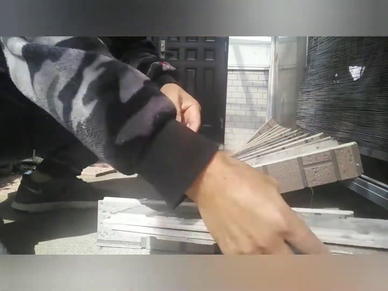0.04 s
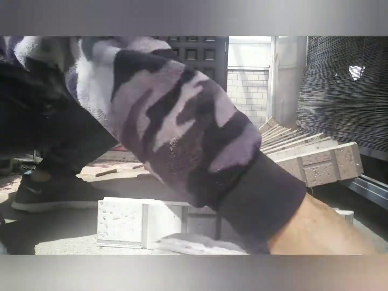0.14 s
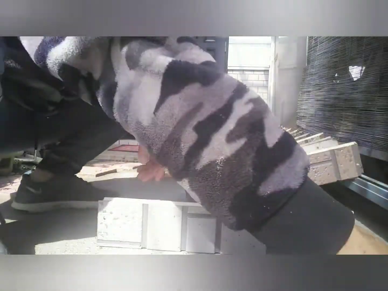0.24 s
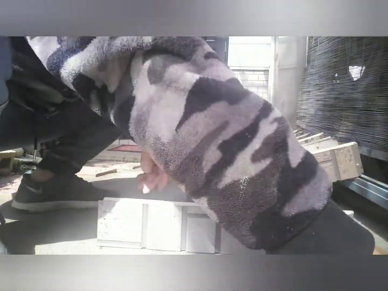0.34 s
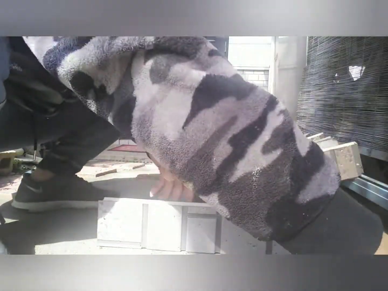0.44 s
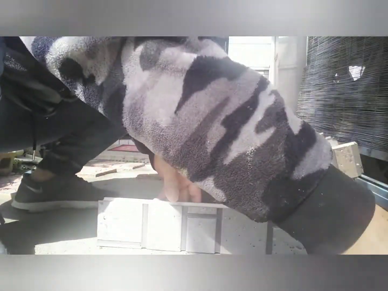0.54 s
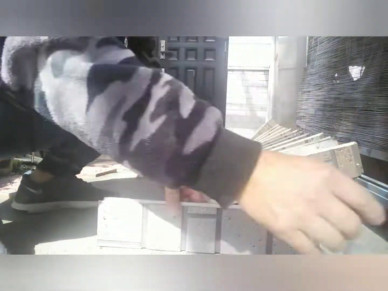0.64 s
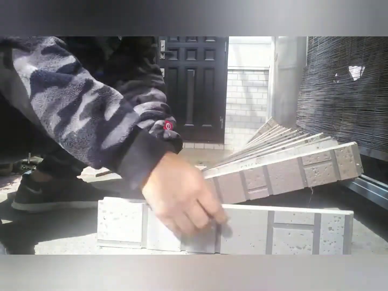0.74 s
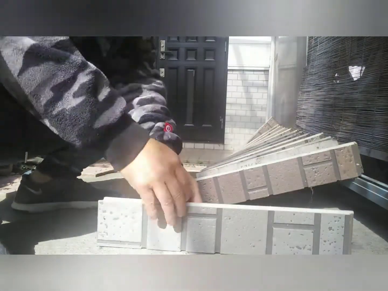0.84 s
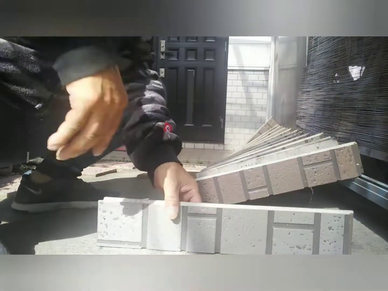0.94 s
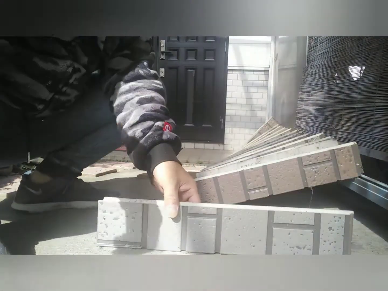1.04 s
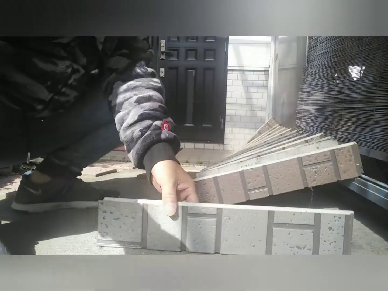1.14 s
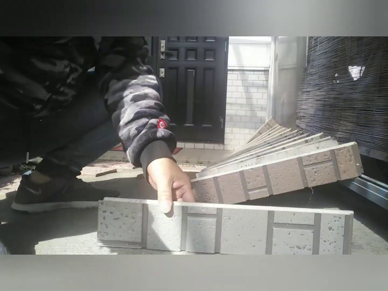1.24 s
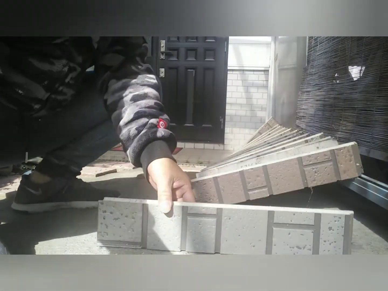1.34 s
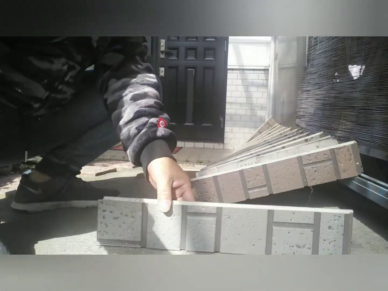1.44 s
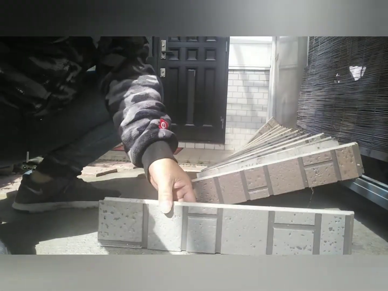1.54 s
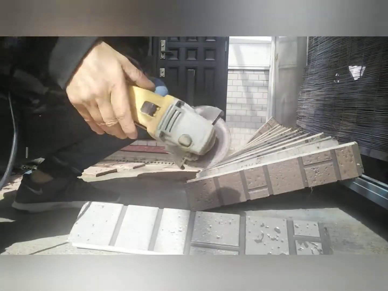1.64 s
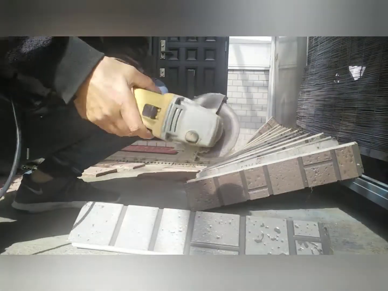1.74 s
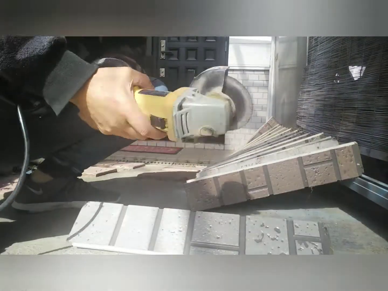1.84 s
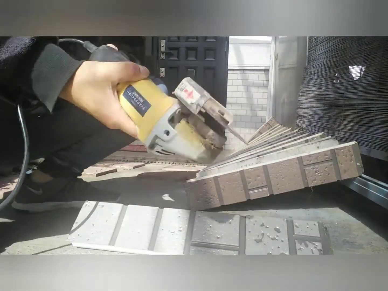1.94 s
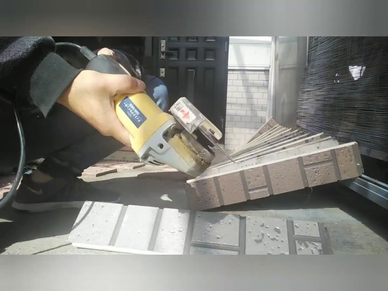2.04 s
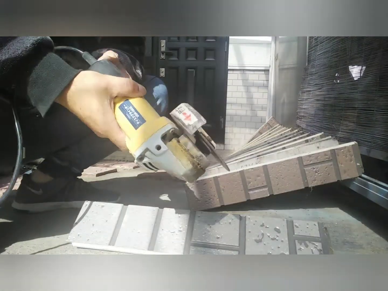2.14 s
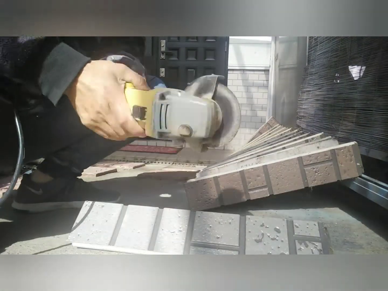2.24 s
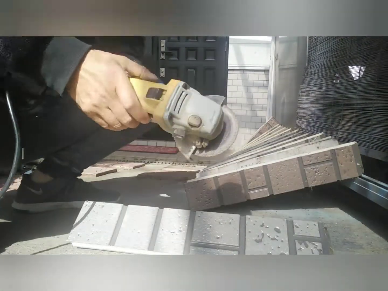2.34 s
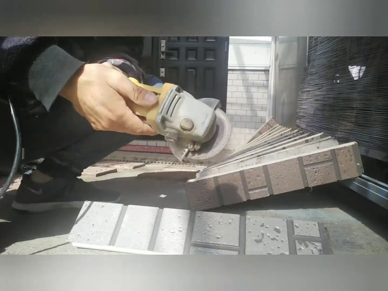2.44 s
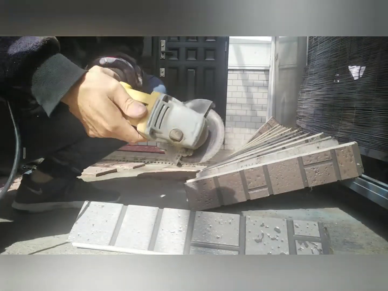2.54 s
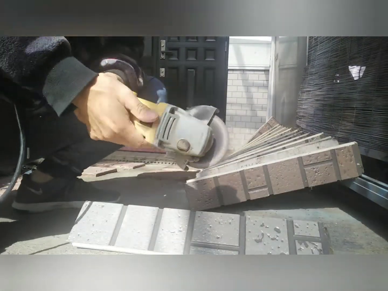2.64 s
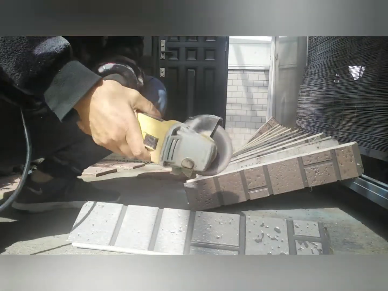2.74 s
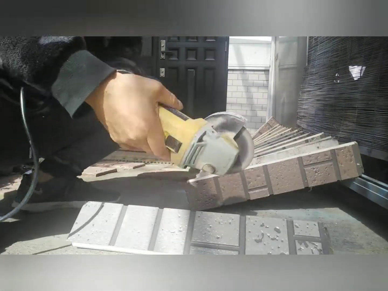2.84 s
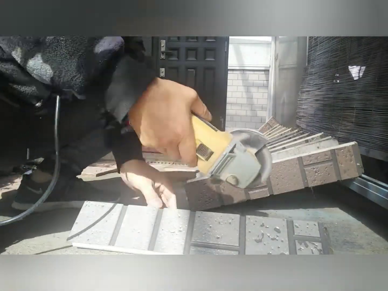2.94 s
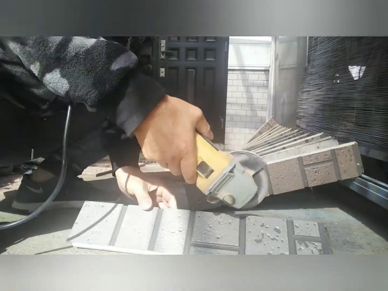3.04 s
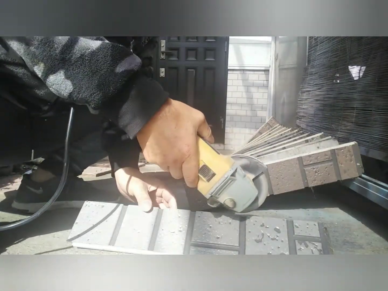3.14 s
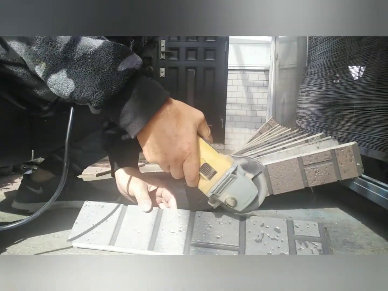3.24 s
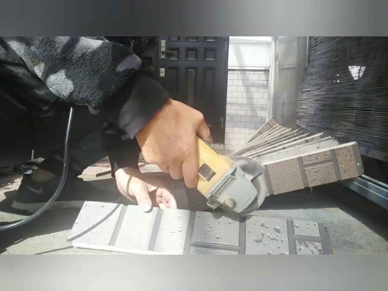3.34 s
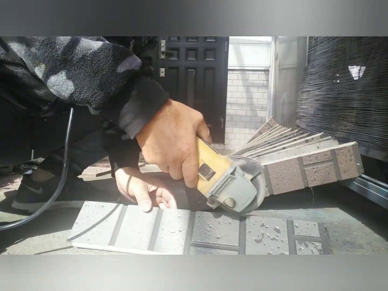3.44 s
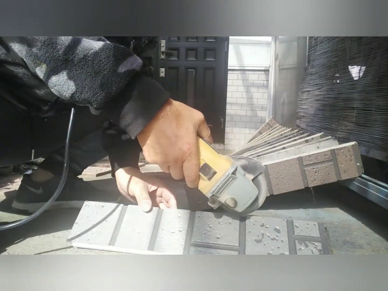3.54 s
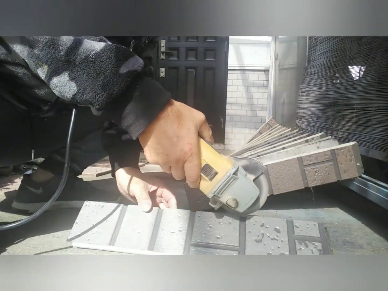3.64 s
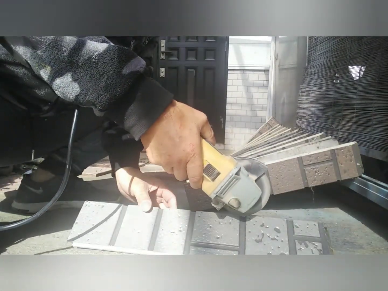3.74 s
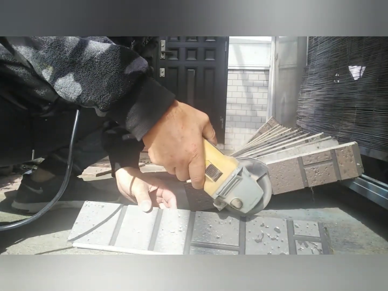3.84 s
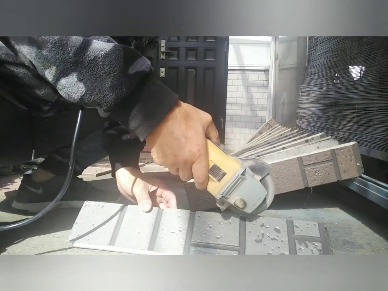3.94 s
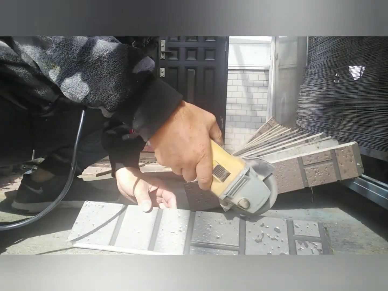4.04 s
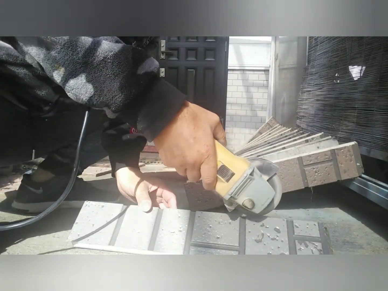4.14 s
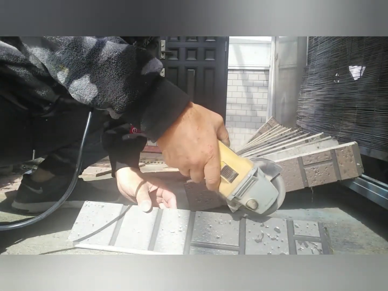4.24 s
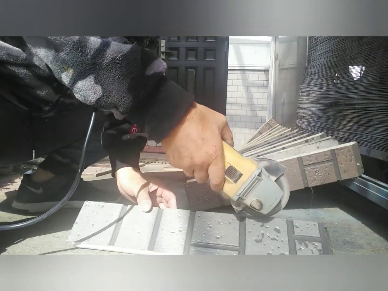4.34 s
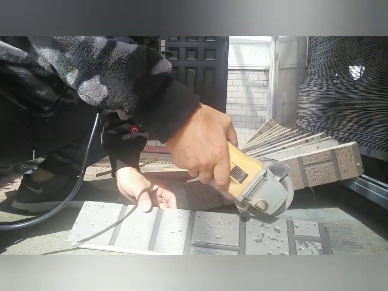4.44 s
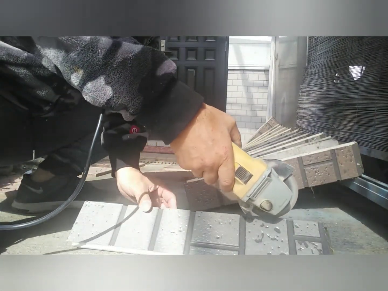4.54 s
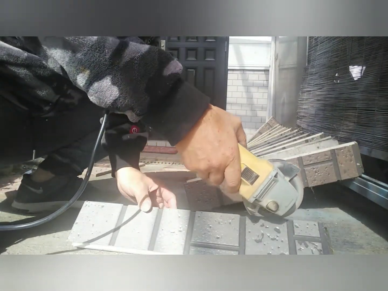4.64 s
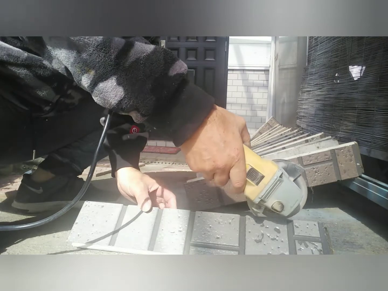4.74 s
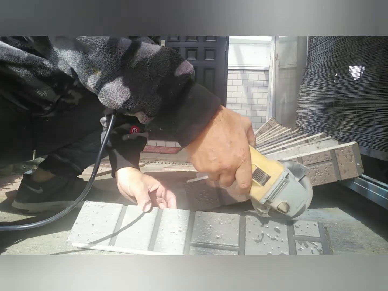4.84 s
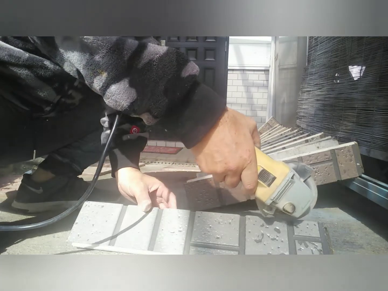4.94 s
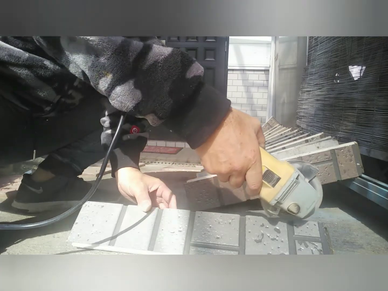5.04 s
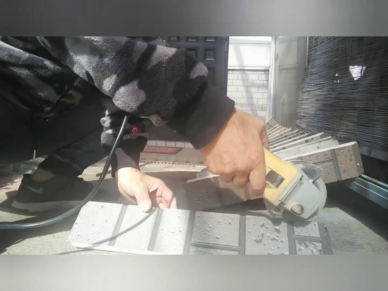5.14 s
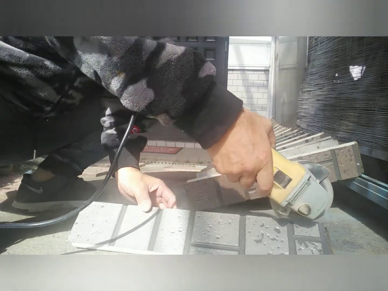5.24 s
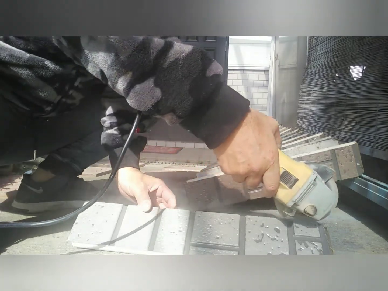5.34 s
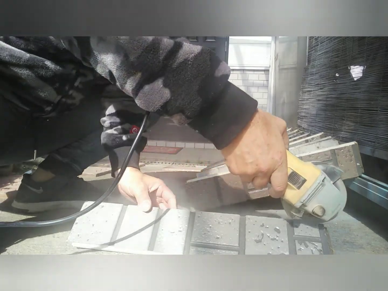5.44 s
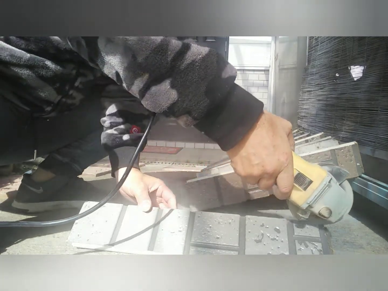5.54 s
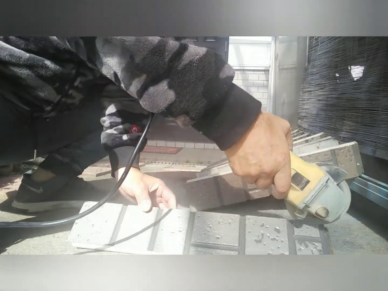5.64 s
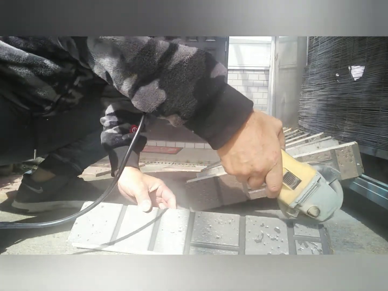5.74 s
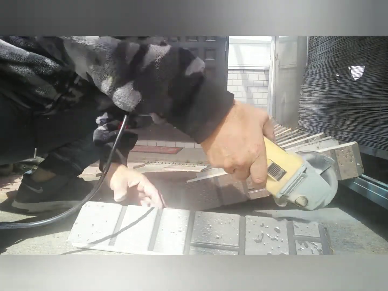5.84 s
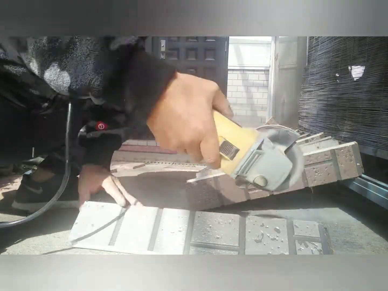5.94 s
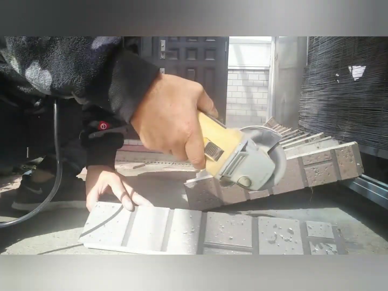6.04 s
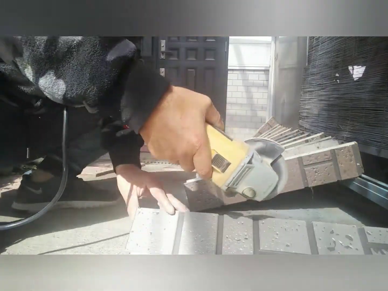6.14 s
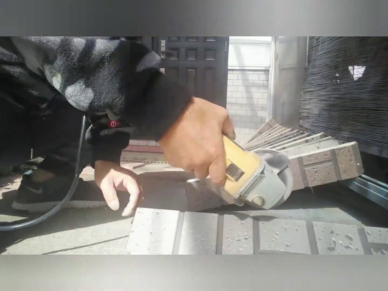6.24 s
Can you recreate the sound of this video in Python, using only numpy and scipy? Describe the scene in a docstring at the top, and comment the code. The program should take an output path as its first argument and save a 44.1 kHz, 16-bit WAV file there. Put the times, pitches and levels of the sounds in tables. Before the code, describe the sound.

After a few dry board knocks and a clunk, an angle grinder starts, grinds through siding as its pitch sags, then revs back up.

```python
"""Siding boards land on a concrete yard with a few dry knocks, over a sleeve's rustle and a low rumble. An
angle grinder is picked up with a clunk; the sound drops out for an instant and the background comes back
quieter. At 2.6 s the motor kicks in and whines up to speed, gears clattering and brushes hissing. From 3.3 s
the disc bites into a board, growling and spitting grit as the drag pulls the pitch down. At 5.8 s it lifts off,
grazes the board once and revs back up. All is heard close by, in mono."""
import sys
import numpy as np
from scipy import signal
from scipy.fft import rfft, irfft
from scipy.io import wavfile
from scipy.ndimage import uniform_filter1d, map_coordinates

SR = 44100
rng = np.random.default_rng(int(sys.argv[2]) if len(sys.argv) > 2 else 0)


def wrap_up_sound(samples):
    """Save the sound to the file named by the first command line argument, as 16-bit audio."""
    columns = np.atleast_2d(samples).T
    # keep every value between -1 and 1, then stretch to whole-number steps
    tamed = np.clip(columns, -1, 1)
    steps = np.round(tamed * 32767).astype(np.int16)
    wavfile.write(sys.argv[1], SR, steps)


N = 277830
T = np.arange(N) / SR
SWITCH_ON_S, KICK_HZ, FREE_HZ = 2.572, 201, 467  # the shaft's rate at switch-on and running free
DISC_RATIO = 14 / 37  # disc turns per shaft turn
DROPOUT_START_S, DROPOUT_END_S = 1.578, 1.603

# How hard the push into the board brakes the shaft: time_s, drag_hz
PUSH_CURVE = [(3.25, 0), (3.36, 2.5), (3.6, 3.5), (3.82, 14), (4.08, 26), (4.19, 44), (4.4, 39.5),
              (4.74, 57), (5.01, 75), (5.44, 110), (5.5, 93), (5.55, 62.5), (5.78, 80), (5.815, 0)]
# Motor whine (1 is unbalance, 7 the fan, 12 the commutator):
# shaft_multiple, level_db, full_current_change_db, roughness_0_to_1
MOTOR_TONES = [(1, -36, -1.5, 0.26), (2, -51.5, -22, 0.37), (4, -43, -4, 0.15), (7, -38, 1, 0.32),
               (8, -44, -9, 0.5), (12, -41.5, -4, 0.28), (13, -49, 0, 0.7), (14, -49.5, 10, 0.85)]
# Body and guard resonances that lift a tone gliding through: centre_hz, width_hz, lift_db
BODY_RESONANCES = [(415.5, 29, 7), (2907, 140, 8.5), (3268, 51, 5.5), (4520, 270, 3), (5030, 180, 5),
                   (5550, 120, 3)]
# Colour of the gear clatter: frequency_hz, gain_db
GEAR_EQ = [(40, -19), (150, -17), (340, -11.5), (500, -14), (660, -6), (850, -14.5), (1300, -11),
           (2000, -5), (2900, 1), (3400, -4.5), (4100, -7), (5000, -7.5), (5700, -4), (7200, -20)]
# Colour of the brush hiss: frequency_hz, gain_db
BRUSH_EQ = [(3000, -44), (6000, -24), (7300, -14.5), (8500, -12), (9700, -7.5), (10700, -2.5), (11400, 2.5),
            (12200, -5.5), (13500, -9), (16000, -10.5)]
# Uneven rim; half multiples are the board bouncing every other turn: disc_multiple, force_db
RIM_HARMONICS = [(3.5, -4), (4, 1.5), (4.5, -7.5), (5, -8), (5.5, 4.5), (6, -0.5), (7, -0.5), (7.5, -0.5),
                 (8, -1.5), (9, -6.5), (10, -0.5), (11, 1), (12, -14), (13, 3.5), (15, 4.5), (16, -2),
                 (17, 0)]
# Resonances of the board under the disc: centre_hz, width_hz, gain_db
BOARD_FORMANTS = [(400, 68, -2.5), (573, 28, 2), (639, 200, 3.5), (826, 31, 2.5), (1137, 77, 1.5),
                  (1748, 86, 1.5), (2584, 350, 2)]
# Colour of the flying grit: frequency_hz, gain_db
GRIT_EQ = [(30, -14), (60, 1.5), (150, 1), (300, 5), (1000, 5), (3700, -5.5), (4800, 2), (6200, 2.5),
           (7200, -8.5), (9400, 0.5), (11000, 2), (12500, 7), (16000, 3.5)]
# Brief tones swelling during the cut; the highest is the motor's whine squealing under load:
# peak_s, half_width_s, disc_multiple, level_db
BRIEF_TONES = [(3.68, 0.067, 14, -26.5), (3.95, 0.12, 14, -36), (4.157, 0.21, 4, -31.5),
               (4.248, 0.23, 7, -40), (4.71, 0.2, 5, -29), (4.853, 0.074, 11, -39.5),
               (5.153, 0.064, 15, -40), (5.33, 0.072, 32, -29.5), (5.458, 0.1, 6, -26.5),
               (5.474, 0.078, 4, -32), (5.48, 0.082, 9, -33), (5.523, 0.06, 32, -31.5)]
# Early reflections off concrete and boards: delay_s, gain_db
REFLECTIONS = [(0.0012, -13), (0.0023, -13), (0.0041, -14)]
# Moving air buffeting the microphone: peak_s, half_width_s, centre_hz, width_hz, level_db
AIR_PUFFS = [(2.545, 0.038, 75, 60, -59), (3.36, 0.026, 153, 350, -40), (3.66, 0.084, 130, 220, -47),
             (3.84, 0.055, 130, 220, -41), (4.7, 0.046, 130, 220, -40), (4.93, 0.061, 70, 130, -38)]
# Boards landing: start_s, ring_db, crack_db, thud_db, crack_t60_s, hardness_hz
BOARD_KNOCKS = [(.272, -43, -52, -64, 0.071, 3000), (.288, -25, -32.5, -36, 0.025, 4000),
                (.293, -46, -28, -63, 0.014, 4000), (.462, -47.5, -58, -62, 0.11, 4000),
                (.488, -45, -60, -66, .03, 2500), (.5165, -60, -21, -37, 0.018, 6000),
                (.5275, -38, -44, -58, 0.08, 5000), (.795, -46, -42.5, -61, 0.057, 3700),
                (.915, -41, -60, -44, 0.055, 1800), (.952, -50, -72, -39, .03, 800),
                (1.004, -37.5, -72, -34, .03, 900)]
# Ring of a board: pitch_hz, level_db, t60_s
BOARD_MODES = [(311, -6, 0.04), (524, -11.5, 0.056), (663, -2.5, 0.043), (790, -14, 0.041),
               (897, -10, 0.055), (1223, -7.5, 0.028), (1480, -17.5, 0.022), (1820, -30, 0.061),
               (2360, -5.5, 0.038)]
# Grinder being picked up: start_s, ring_db, crack_db, thud_db, crack_t60_s, hardness_hz
PICKUP_CLUNKS = [(1.345, -53, -78, -48, .03, 1000), (1.387, -59, -69, -31, .04, 900),
                 (1.402, -44, -68, -34, .04, 900), (1.42, -48, -67, -30, 0.11, 1000),
                 (1.448, -40, -63, -44, .06, 1300), (1.4865, -24.5, -36, -40, 0.029, 9500),
                 (1.52, -42, -62, -38.5, .06, 2550)]
# Ring of the housing and guard: pitch_hz, level_db, t60_s
HOUSING_MODES = [(166, 1.5, 0.099), (199, 0.5, 0.023), (504, -0.5, 0.029), (592, -11.5, 0.05),
                 (1150, -15, 0.027), (2130, -1, 0.023), (2250, -5, 0.025), (3900, -31, .025),
                 (4570, -21, .025), (6400, -1, 0.019), (7060, -12, 0.016), (11160, 11.5, 0.013),
                 (11800, 2, 0.013), (13300, 3, .008)]
# Colour of an impact's crack: frequency_hz, gain_db
CRACK_EQ = [(100, -11), (700, -8), (1100, -6.5), (1700, 2.5), (2300, 3.5), (2900, -6.5), (4000, 2.5),
            (5800, -6), (7800, -38), (11000, -22), (16000, -36)]
# Sleeve moving with the arm: peak_s, half_width_s, level_db
SLEEVE_SWISHES = [(0.02, 0.15, -67.5), (0.45, 0.19, -65.5), (0.8, 0.15, -64), (1.25, 0.22, -69),
                  (1.79, 0.082, -69), (2.26, 0.085, -73), (2.42, 0.028, -69)]
# Colour of the cloth: frequency_hz, gain_db
SLEEVE_EQ = [(200, -16), (900, -4), (1500, -5.5), (3500, -3.5), (5500, -3), (7500, -25), (9000, -13.5),
             (11300, 5), (13000, -10.5), (16000, -18.5)]
# Bright scuffs of a board edge or the tool: peak_s, half_width_s, level_db
EDGE_SCUFFS = [(0.358, 0.014, -59), (0.46, 0.051, -61.5), (0.548, 0.0091, -56), (0.88, 0.047, -70),
               (1.78, 0.01, -67.5), (1.835, 0.032, -71.5), (2.21, 0.027, -74), (2.3, 0.028, -76)]
# Duller scrapes over concrete: peak_s, half_width_s, centre_hz, width_hz, level_db
CONCRETE_SCRAPES = [(0.65, 0.055, 854, 587, -64), (1.27, 0.09, 950, 700, -75.5),
                    (1.445, 0.018, 600, 1300, -56), (1.45, 0.017, 2220, 500, -61)]
# Colour of the outdoor bed: frequency_hz, gain_db
YARD_EQ = [(15, -55), (25, -18.5), (80, -0.5), (161, -9.5), (317, -16.5), (405, -19), (439, -22.5),
           (754, -22), (887, -25), (962, -25.5), (7110, -45), (11300, -29), (13600, -38.5), (14800, -21),
           (16000, -49)]


def grinder():
    """One shaft drives motor, gears, brushes and cut; clatter and hiss sink as it slows."""
    shaft_hz, bite = shaft()
    jitter = (0.000557 + 0.0012 * bite) * wander(36)
    turns = np.cumsum(shaft_hz * (1 + jitter)) / SR
    octaves_down = np.log2(FREE_HZ / shaft_hz)
    machine = motor(turns, shaft_hz, bite)
    machine += gears(turns) * undb(-25 - 6 * octaves_down)
    machine += brushes(turns) * undb(-26.5 + 1.5 * bite - 5.5 * octaves_down)
    fade_in = np.clip((T - SWITCH_ON_S) / 0.02, 0, 1)
    return (machine + cut(turns * DISC_RATIO, shaft_hz * DISC_RATIO, bite)) * fade_in


def shaft(inertia_s=0.121, bite_drag_hz=28):
    """Shaft rate and depth of bite (0-1): the motor spins up, sags and recovers with the same lag."""
    drag_hz = np.interp(T, *np.transpose(PUSH_CURVE))
    pole = np.exp(-1 / (inertia_s * SR))
    sag_hz = signal.lfilter([1 - pole], [1, -pole], drag_hz)
    spin_up_gap_hz = (FREE_HZ - KICK_HZ) * np.exp(-np.maximum(T - SWITCH_ON_S, 0) / inertia_s)
    bite = np.tanh(drag_hz / bite_drag_hz) ** 1.48
    return FREE_HZ - spin_up_gap_hz - sag_hz, bite


def motor(turns, shaft_hz, bite, full_current_sag_hz=55):
    """Shaft harmonics whine and roughen with current; bouncing brushes rasp at the commutator tone."""
    current = np.clip((FREE_HZ - shaft_hz) / full_current_sag_hz, 0, 1)
    whine = 0
    for multiple, db, current_db, rough in MOTOR_TONES:
        level_db = db + current_db * current + body_lift_db(multiple * shaft_hz)
        level_db -= 0.5 * wander(4)  # the tool moves in the hand
        partial = rough_tone(multiple * turns, rough * (1 + 0.21 * current), 40 + 8 * multiple)
        whine += undb(level_db) * partial
    whine *= np.interp(shaft_hz, [295, 367], [0, 1])  # fades in with speed
    surge_db = 7.5 * np.sqrt(current) * (1 - bite)  # strongest while speeding up
    rasp_db = -42 + surge_db - 0.5 * bite + body_lift_db(12 * shaft_hz) / 2
    return whine + undb(rasp_db) * rough_tone(12 * turns, rough=1, flutter_hz=410)


def body_lift_db(pitch_hz):
    """Boost that the resonating body and guard give a tone."""
    return sum(db * bell(pitch_hz, hz, width) for hz, width, db in BODY_RESONANCES)


def gears(turns, knocks_per_s=170, knock_decay_s=0.0009):
    """Bevel gears clatter differently on each turn, with stray knocks from their play."""
    mesh = rough_wheel(turns * DISC_RATIO, memory=0.18, spiky_db=2.2)
    knocks = (rng.random(N) < knocks_per_s / SR) * rng.random(N)
    knock_envelope = signal.lfilter([1], [1, -np.exp(-1 / (knock_decay_s * SR))], knocks)
    rattle = unit(knock_envelope) * noise()
    pulse = 1 + 0.24 * np.cos(2 * np.pi * turns)
    return colour(mesh * pulse * undb(0.69 * wander(48)) + undb(-4.5) * rattle, GEAR_EQ)


def brushes(turns):
    """Carbon brushes hiss on the commutator, pulsing slightly once a turn."""
    pulse = 1 + 0.3 * np.cos(2 * np.pi * turns)
    return ground_bounce(colour(noise() * pulse * undb(2.2 * wander(390)), BRUSH_EQ))


def cut(disc_turns, disc_hz, bite):
    """The rim hammers the board into a growl and grit hisses from the slot; brief tones swell on top."""
    drone = 0
    for multiple, db in RIM_HARMONICS:
        partial = rough_tone(multiple * disc_turns, rough=0.28, flutter_hz=51)
        drone += undb(db) * board_gain(multiple * disc_hz) * partial
    force = rough_wheel(disc_turns / 2, memory=0.097, spiky_db=0)
    rasp = unit(irfft(rfft(force) * board_gain(np.fft.rfftfreq(N, 1 / SR)) ** 2, N))
    growl = unit(unit(drone) + undb(1.5) * rasp) * undb(-25.5 + 1.6 * wander(100))
    grains = rough_wheel(disc_turns, memory=0.24, spiky_db=1) * undb(2 * wander(150))
    grit = ground_bounce(colour(grains, GRIT_EQ)) * undb(-25)
    brief_tones = 0
    for peak_s, half_width_s, multiple, db in BRIEF_TONES:
        tone = rough_tone(multiple * disc_turns, rough=0.48, flutter_hz=69)
        brief_tones += undb(db) * swell(peak_s, half_width_s) * tone
    graze = unit(resonate(resonate(force, 670, 210), 707, 280))  # a last touch on the way out
    graze *= undb(-26) * swell(peak_s=6.065, half_width_s=0.033)
    return growl * bite + grit * bite ** 0.32 + brief_tones + graze


def board_gain(pitch_hz):
    """How strongly the board radiates a force at each frequency."""
    return np.sqrt(sum(undb(db) ** 2 * bell(pitch_hz, hz, width) for hz, width, db in BOARD_FORMANTS))


def ground_bounce(x, drift_s=0.00005):
    """Reflections drift as the tool moves, gently flanging the hiss."""
    reflected = 0
    for delay_s, db in REFLECTIONS:
        read_s = T - delay_s - drift_s * wander(2)
        reflected += undb(db) * map_coordinates(x, [read_s * SR], order=3)
    return unit(x + reflected)


def handling(echo_t60_s=0.091):
    """Boards knock and the tool clunks, with a faint short echo off nearby walls."""
    hits = impacts(BOARD_KNOCKS, BOARD_MODES, thud_hz=203, thud_t60_s=0.032)
    hits += impacts(PICKUP_CLUNKS, HOUSING_MODES, thud_hz=70.4, thud_t60_s=0.074)
    t = T[:SR // 3]
    walls = rng.standard_normal(len(t)) * undb(-60 * t / echo_t60_s) * (t > 0.004)
    echo = signal.fftconvolve(hits, walls / np.linalg.norm(walls))[:N]
    return hits + undb(-15.5) * echo


def impacts(hits, modes, thud_hz, thud_t60_s, attack_s=0.0012):
    """Each hit rings the object's modes, cracks at the contact and thuds on the ground."""
    track, crack_noise = np.zeros(N), colour(noise(), CRACK_EQ)
    t = T[:SR // 4]
    for start_s, ring_db, crack_db, thud_db, crack_t60_s, hardness_hz in hits:
        span = slice(int(start_s * SR), int(start_s * SR) + len(t))
        detune = 1 + 0.012 * rng.standard_normal(len(modes))
        ring = 0
        for k, (hz, db, t60_s) in enumerate(modes):
            drive = (-1) ** k / (1 + (hz / hardness_hz) ** 2)  # a soft contact misses the high modes
            ring += drive * undb(db - 60 * t / t60_s) * np.sin(2 * np.pi * hz * detune[k] * t)
        thud = undb(thud_db - 60 * t / thud_t60_s) * np.sin(2 * np.pi * thud_hz * t)
        crack = undb(crack_db - 60 * t / crack_t60_s) * crack_noise[span]
        track[span] += (undb(ring_db) * ring + thud + crack) * np.minimum(t / attack_s, 1)
    return track


def rubbing():
    """Grainy friction: a sleeve swishes, and boards and tool slide on concrete."""
    sleeve = colour(noise(), SLEEVE_EQ) * strokes(SLEEVE_SWISHES)
    scuffs = noise_band(centre_hz=3800, width_hz=4200) * strokes(EDGE_SCUFFS)
    return (sleeve + scuffs + bursts(CONCRETE_SCRAPES)) * undb(2.7 * wander(123))


def yard():
    """Low outdoor rumble and thin microphone hiss, both stepping down at the dropout."""
    hiss = undb(-10.5) * noise_band(centre_hz=14700, width_hz=900)
    rumble = colour(noise(), YARD_EQ) * undb(2.4 * wander(20))
    return (rumble + hiss) * undb(np.where(T < DROPOUT_START_S, -61, -68))


def rough_wheel(turns, memory, spiky_db):
    """Rolling contact: each turn keeps a share (memory) of the last turn's bumps and adds new ones."""
    bumps_per_turn = 256
    shape = (1200, bumps_per_turn)
    bumps = rng.standard_normal(shape) * undb(spiky_db * rng.standard_normal(shape))
    worn = signal.lfilter([1], [1, -memory], bumps, axis=0).ravel()
    return unit(map_coordinates(worn, [turns * bumps_per_turn], order=3, mode="wrap"))


def rough_tone(cycles, rough, flutter_hz):
    """A sine of rms 1 with a share of fluttering amplitude and phase."""
    rough, phase = np.clip(rough, 0, 1), 2 * np.pi * cycles
    amplitude = np.sqrt(2 * (1 - rough ** 2)) + rough * wander(flutter_hz)
    return amplitude * np.sin(phase) + rough * wander(flutter_hz) * np.cos(phase)


def bursts(table):
    """Short swells of noise, each in its own band."""
    return sum(noise_band(hz, width_hz) * undb(db) * swell(peak_s, half_width_s)
               for peak_s, half_width_s, hz, width_hz, db in table)


def strokes(table):
    """An envelope that swells once per row."""
    return sum(undb(db) * swell(peak_s, half_width_s) for peak_s, half_width_s, db in table)


def swell(peak_s, half_width_s):
    """A smooth rise and fall, down to 1/e at half_width_s from the peak."""
    return np.exp(-((T - peak_s) / half_width_s) ** 2)


def colour(x, eq):
    """Apply an EQ curve, rolling off past its ends; rms 1."""
    hz, db = np.transpose(eq)
    bins_hz = np.maximum(np.fft.rfftfreq(N, 1 / SR), 1)
    skirts = np.minimum(bins_hz / hz[0], 1) * np.minimum(hz[-1] / bins_hz, 1) ** 2
    gain = undb(np.interp(np.log(bins_hz), np.log(hz), db))
    return unit(irfft(rfft(x) * skirts * gain, N))


def bell(hz, centre_hz, width_hz):
    """A resonance curve, 1 at its centre."""
    return 1 / (1 + (2 * (hz - centre_hz) / width_hz) ** 2)


def resonate(x, centre_hz, width_hz):
    """A resonant band-pass, gain 1 at its centre."""
    return signal.lfilter(*signal.iirpeak(centre_hz, centre_hz / width_hz, fs=SR), x)


def noise_band(centre_hz, width_hz):
    """Noise band-passed twice; rms 1."""
    return unit(resonate(resonate(noise(), centre_hz, width_hz), centre_hz, width_hz))


def wander(rate_hz):
    """Smooth random modulation; rms 1."""
    width = int(SR / rate_hz)
    return unit(uniform_filter1d(uniform_filter1d(noise(), width), width))


def noise():
    """White noise."""
    return rng.standard_normal(N)


def unit(x):
    """Scale to an rms of 1."""
    return x / np.sqrt(np.mean(x ** 2))


def undb(db):
    """Decibels to gain."""
    return 10 ** (np.asarray(db) / 20)


def scene():
    """The mono mix on both channels, with a brief dropout after the pickup."""
    gate = uniform_filter1d(1.0 * ((T < DROPOUT_START_S) | (T > DROPOUT_END_S)), size=128)
    mix = (handling() + rubbing() + yard()) * gate + grinder() + bursts(AIR_PUFFS)
    return np.tile(mix, (2, 1))


def record(dry, cutoff_hz=15850):
    """A phone's steep low-pass shaves off the top."""
    return signal.sosfilt(signal.ellip(12, 0.2, 80, cutoff_hz, fs=SR, output="sos"), dry)


dry = scene()
out = record(dry)
wrap_up_sound(out)
```